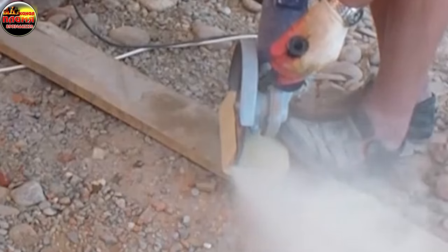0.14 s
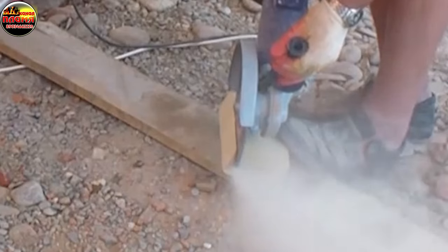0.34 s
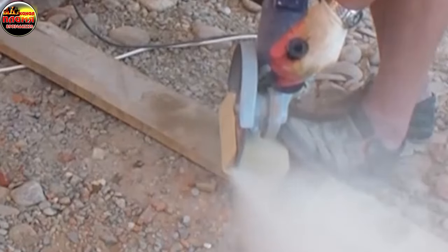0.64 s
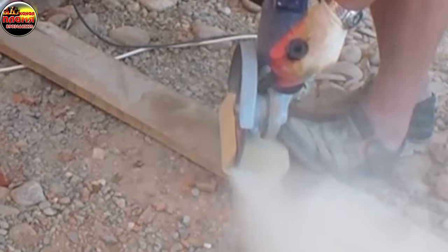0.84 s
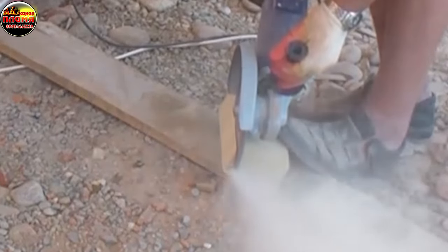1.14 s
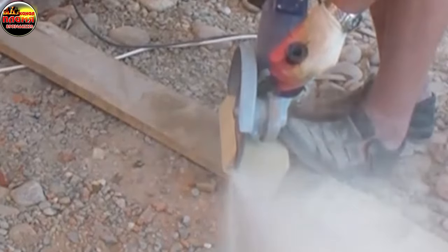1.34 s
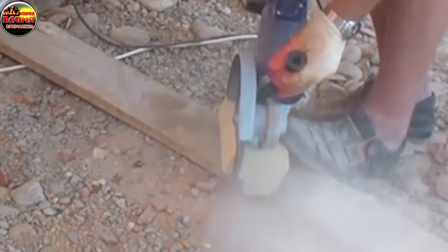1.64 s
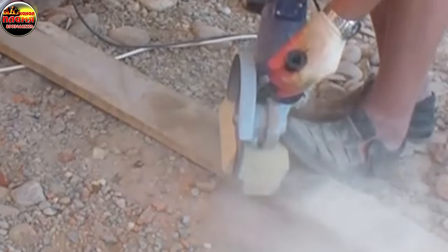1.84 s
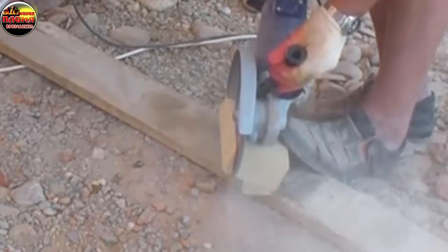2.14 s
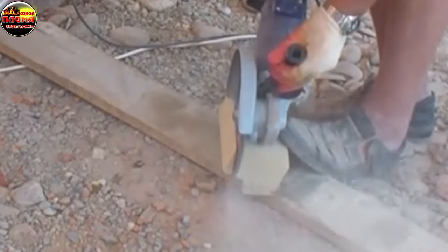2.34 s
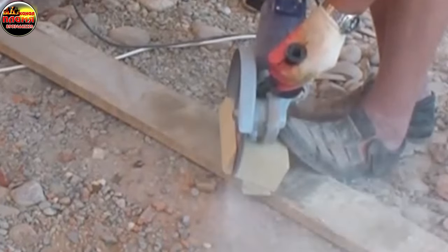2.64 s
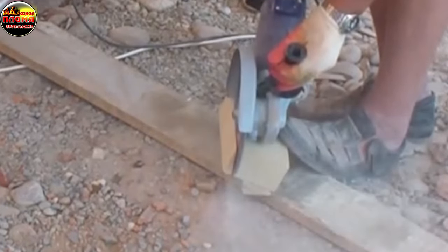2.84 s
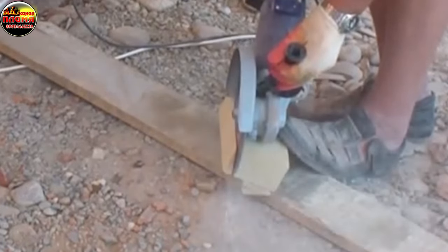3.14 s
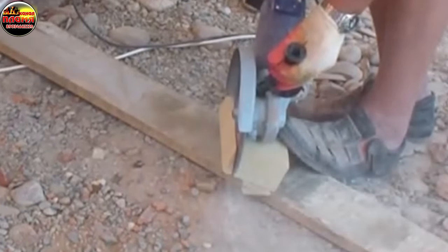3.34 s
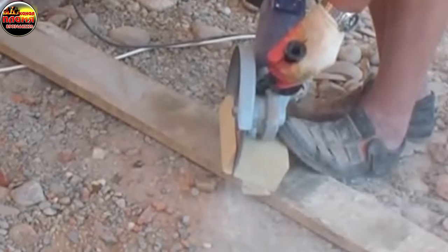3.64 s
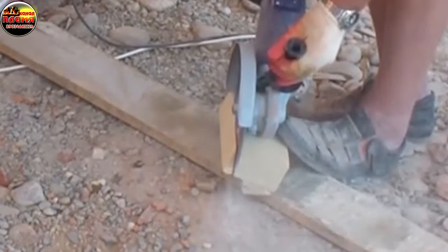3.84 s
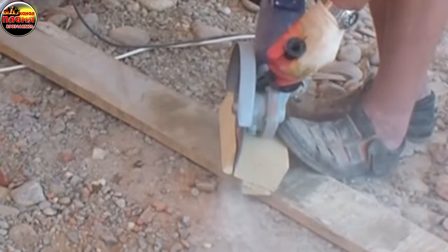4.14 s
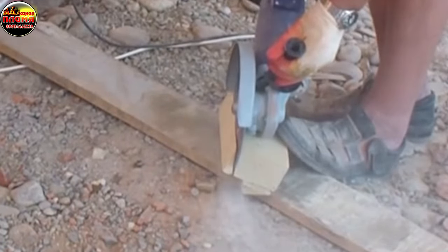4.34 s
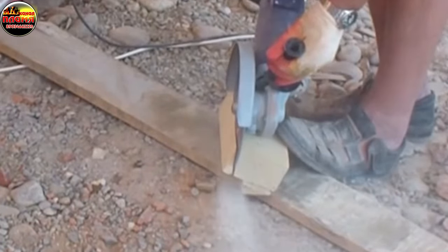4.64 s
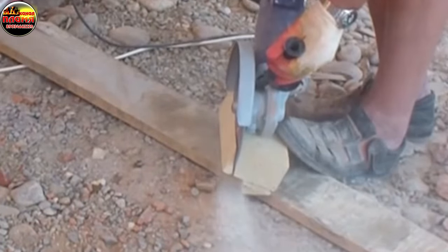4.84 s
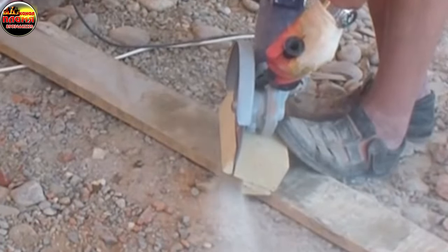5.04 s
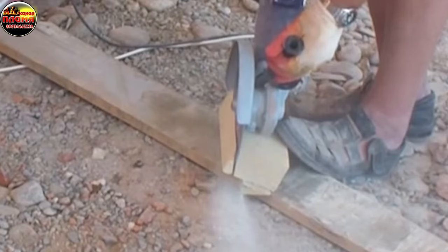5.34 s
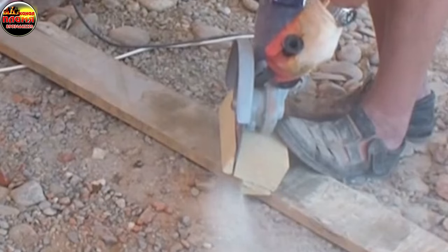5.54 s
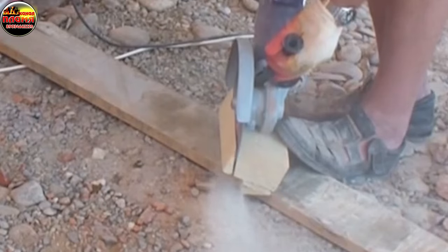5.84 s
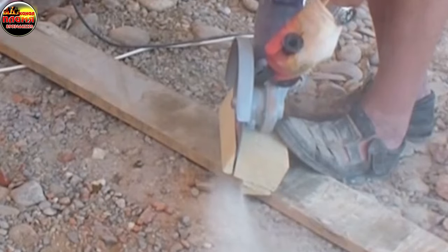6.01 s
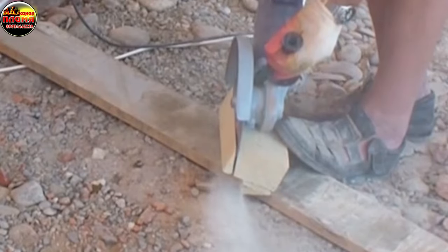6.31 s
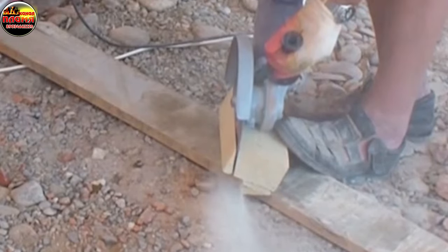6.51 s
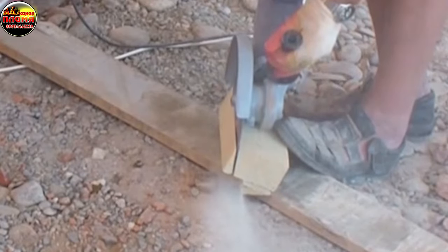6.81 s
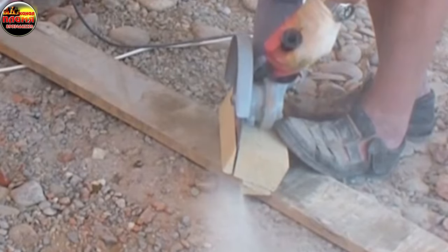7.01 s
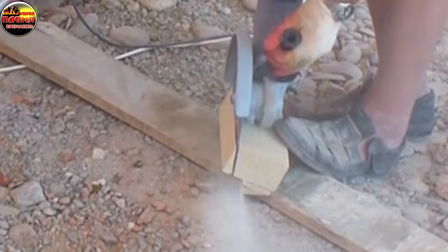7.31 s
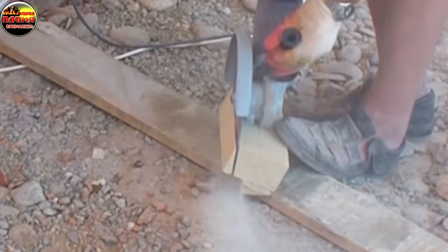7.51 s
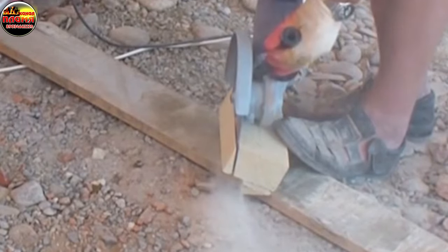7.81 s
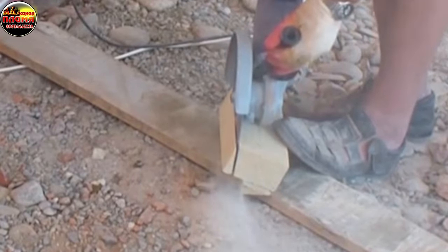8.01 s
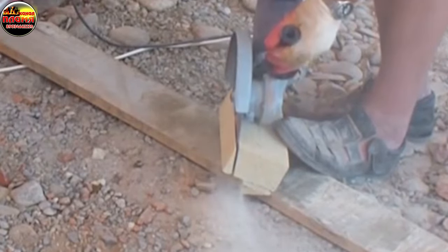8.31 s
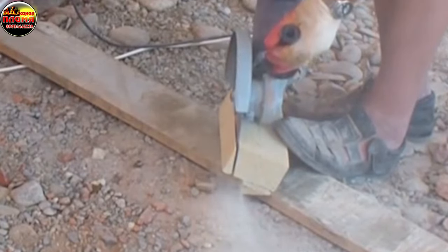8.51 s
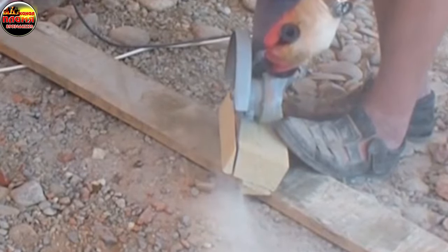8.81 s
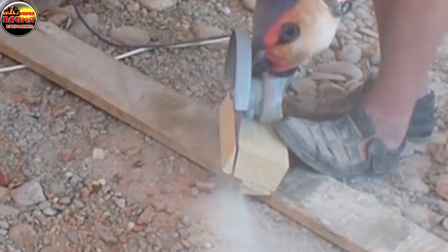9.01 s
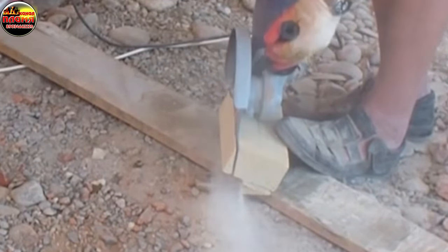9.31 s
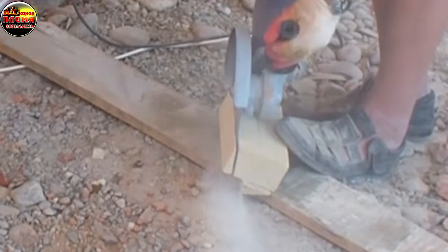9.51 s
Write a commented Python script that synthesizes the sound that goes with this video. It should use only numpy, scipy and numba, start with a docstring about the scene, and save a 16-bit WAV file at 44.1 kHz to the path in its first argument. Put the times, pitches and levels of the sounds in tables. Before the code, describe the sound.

A grinder's disc is already cutting brick at 0 seconds and never stops through about 9.7 seconds. Close and dry outdoors, the sound is a dense bright hiss of torn grit and dust, packed with rough, shrill metallic resonances, with a fast buzz-like flutter from the spinning disc and the hand's pressure. Beneath it a much quieter hoarse growl throbs irregularly, with clear surges around 0.2 to 1.5, 1.9, 2.3, 3.6 to 3.8 and 5.1 seconds. Near 1.7 the disc seats: the ringing rises slightly in pitch and the scrape becomes fuller. Small changes of colour follow near 2.8, 4.1 and 5.5, and gradually from 7.7 to 8.3. From about 5.4, short rough mid-pitched whines flicker in and out, strongest around 8.1 to 9.4, when the bite eases slightly around 9.2 before recovering. Treble is wide in stereo, lower sound central.

```python
"""Cutting a brick on gravel

Outdoors, an angle grinder's steel disc cuts a brick on gravel, close to a small camera. Dense random grit rings
the modes of disc, brick and guard; the depth of the slot sets how loud each mode is. Coloured noise makes the
hiss of torn grit and dust. The hand's pressure makes the bite flutter, and the disc rubs once a turn. The low
growl throbs as the disc catches, and wavering sine tones make short spells of whine."""
import sys
import numpy as np
from scipy import signal
from scipy.fft import rfft, irfft, next_fast_len
from scipy.io import wavfile
from scipy.ndimage import uniform_filter1d
from numba import njit

SR = 44100
rng = np.random.default_rng(int(sys.argv[2]) if len(sys.argv) > 2 else 0)


def store_pcm(level_fs):
    """Save levels as 16-bit WAV."""
    pcm = np.round(np.clip(level_fs, -1, 1) * 32767).astype(np.int16)
    wavfile.write(sys.argv[1], SR, np.atleast_2d(pcm).T)


N = 425994


def undb(db):
    """Amplitude factor of a level in dB."""
    return np.exp(np.asarray(db) * (np.log(10) / 20))


def unit(x):
    """Scale to an rms of 1, taken over all views together."""
    return x / np.sqrt(np.mean(x ** 2))


def seconds():
    """Time of every sample in s."""
    return np.arange(N) / SR


def curve(table):
    """Columns of a table after its time column, one value per sample."""
    time_s, *columns = np.transpose(table)
    return [np.interp(seconds(), time_s, column) for column in columns]


def colour(x, table):
    """Shape a signal to a (Hz, dB) spectrum, read on a log-frequency axis."""
    size = next_fast_len(N)
    bin_hz = np.arange(size // 2 + 1) * SR / size
    table_hz, table_db = np.transpose(table)
    gain_db = np.interp(np.log(np.maximum(bin_hz, 1)), np.log(table_hz), table_db)
    return irfft(rfft(x, size) * undb(gain_db), size)[:N]


def walk(rate_hz):
    """Random levels held 1 / rate_hz s and smoothed twice; spread 1."""
    hold = int(SR / rate_hz)
    levels = np.repeat(rng.standard_normal(int(N / 200)), hold)[:N]
    levels = uniform_filter1d(uniform_filter1d(levels, hold), hold)
    return levels / levels.std()


def split(x, hz):
    """The parts below and above hz."""
    low = signal.sosfiltfilt(signal.butter(2, hz, fs=SR, output="sos"), x)
    return low, x - low


@njit
def ring(x, start, tuning, stretch, damping):
    """A resonance applied twice (steep skirts), gain 1 at its centre; reads x from its own starting place."""
    y = np.empty(len(x))
    band1, low1, band2, low2 = 0., 0., 0., 0.
    for i in range(len(x)):
        j = (i + start) % len(x)
        g = tuning * stretch[i]
        d = 1 / (1 + g * (g + damping))
        first = (band1 + g * (x[j] - low1)) * d
        band1, low1 = 2 * first - band1, low1 + 2 * g * first
        second = (band2 + g * (damping * first - low2)) * d
        band2, low2 = 2 * second - band2, low2 + 2 * g * second
        y[i] = damping * second
    return y


def resonate(x, start, hz, width_hz, stretch):
    """Ring at hz; width_hz is that of each of the two passes."""
    return ring(x, start, np.tan(np.pi * hz / SR), stretch, width_hz / hz)


def grit(coarse_db):
    """Grains torn off one after another, most small, a few large."""
    size_db = coarse_db * np.minimum(rng.exponential(size=N), 6)
    return unit(rng.standard_normal(N) * undb(size_db))


TWO_VIEWS_HZ = 5200  # lower modes are given one view only, near the centre


def modes(table, depth, stretch, waver_db, drift, waver_hz):
    """Grit rings each mode, which swells and drifts in pitch alone; high modes get a second, unrelated view."""
    force, out = grit(1.28), np.zeros((2, N))
    waver = walk(waver_hz)
    for hz, width_hz, *stage_db in table:
        # the same waver, read from different places
        swell = np.roll(waver, rng.integers(N))
        bend = np.roll(waver, rng.integers(N))
        gain = undb(np.interp(depth, range(len(stage_db)), stage_db) + waver_db * swell)
        for view in range(2 if hz > TWO_VIEWS_HZ else 1):
            start = rng.integers(N)  # reads the grit from a random place, so the noises are unrelated
            out[view] += gain * resonate(force, start, float(hz), width_hz, stretch + drift * bend)
    return out


# how the deepening slot holds the disc: time_s, stage (0 shallow, 1 just seated, 5 deepest)
SLOT_STAGES = [(0, 0), (1.66, 0), (1.76, 1), (2.75, 1), (2.95, 2), (4.06, 2), (4.14, 3), (5.35, 3),
               (5.65, 4), (7.7, 4), (8.35, 5), (9.66, 5)]


def slot_depth():
    """Stage of the slot's grip, which sets the balance of the modes."""
    depth, = curve(SLOT_STAGES)
    return depth


# slow course of the cut: time_s, bite_db (level of the rim),
# scrape_db (gain of the brick, guard and dust between 2 and 7.3 kHz), boom_db (level below 2 kHz)
CUT_COURSE = [(0, -32, -2.5, -52), (1.3, -33, -2, -53), (1.5, -32.5, -0.6, -53), (1.62, -32.5, -1.7, -53.5),
              (1.74, -34.2, 2, -49), (1.85, -33.5, 3, -50), (2.6, -32.5, 0.5, -51), (3.45, -33, 0.5, -52),
              (3.7, -32.5, -0.3, -49), (4.02, -34, 1, -52.5), (4.14, -32, -1.7, -50.4),
              (4.5, -33.5, 1.1, -52.5), (5.8, -33, -2.2, -50), (6.4, -32.5, -1, -53),
              (7.3, -33, -0.5, -51.5), (7.9, -33, -1, -50), (8.6, -33.5, 0.5, -50.5),
              (8.95, -34.5, 1.2, -50), (9.22, -36, 1.5, -48), (9.44, -33, 1.7, -51), (9.66, -33, -2.5, -49)]


def cut_course():
    """Levels of bite, scrape and boom in dB as the cut goes on."""
    return curve(CUT_COURSE)


# modes of the steel disc: pitch_hz (once seated), width_hz (each pass), level_db (relative) at stages 0 to 5
DISC_MODES = [(4097, 87, -17.0, -15.5, -16.5, -21.5, -21.5, -16.0),
              (4229, 75, -13.0, -10.0, -12.5, -11.0, -12.5, -14.0),
              (4348, 73, -27.5, -11.5, -18.5, -27.5, -27.5, -27.5),
              (4447, 129, -16.0, -12.0, -11.0, -11.5, -10.5, -13.0),
              (4629, 87, -20.0, -23.0, -23.0, -24.0, -20.0, -16.5),
              (4990, 132, -16.0, -12.0, -12.0, -13.5, -13.5, -13.5),
              (5249, 82, -28.5, -15.5, -13.5, -16.0, -12.5, -16.5),
              (5360, 84, -12.0, -17.0, -16.5, -12.0, -14.0, -20.0),
              (5500, 105, -14.0, -16.5, -13.0, -12.5, -14.5, -15.5),
              (5620, 65, -27.5, -18.0, -18.5, -27.5, -18.5, -11.5),
              (5772, 84, -15.0, -18.0, -14.0, -12.5, -15.5, -12.5),
              (5880, 70, -13.5, -19.0, -13.5, -23.5, -16.0, -16.0),
              (5972, 70, -25.0, -18.0, -20.5, -12.5, -23.5, -18.5),
              (6075, 56, -25.0, -9.0, -11.0, -20.0, -14.5, -18.5),
              (6154, 82, -15.5, -15.5, -14.5, -11.5, -21.5, -27.5),
              (6210, 36, -6.5, -15.5, -14.0, -20.0, -16.0, -22.5),
              (6280, 82, -25.0, -15.5, -19.5, -18.0, -14.5, -16.0),
              (6391, 99, -11.0, -8.5, -9.0, -8.5, -13.5, -16.5),
              (6549, 132, -18.5, -11.0, -14.5, -19.5, -21.0, -27.0),
              (6760, 65, -24.0, -14.0, -8.0, -9.5, -16.0, -16.5),
              (6845, 60, -4.0, -10.0, -11.0, -8.5, -11.5, -17.0),
              (6920, 60, -8.5, -6.5, -10.0, -22.0, -19.5, -22.5),
              (7075, 240, -11.0, -10.0, -11.0, -10.0, -13.0, -12.5),
              (7343, 240, -10.5, -14.5, -11.5, -13.5, -17.5, -22.5),
              (7753, 76, -1.5, -2.0, -5.0, -3.5, -2.5, -3.5),
              (7930, 172, -7.5, -4.5, -5.5, -3.5, -4.0, -5.0),
              (8124, 112, -5.5, -21.5, -21.5, -7.0, -10.0, -21.5),
              (8299, 240, -3.0, -7.5, -7.0, -8.0, -10.0, -5.0),
              (8473, 157, -17.0, -1.0, -2.0, -4.0, -2.0, -4.0),
              (8738, 234, -6.0, -22.0, -9.0, -8.5, -10.0, -9.5),
              (9119, 240, -8.0, -1.0, -7.0, -4.5, -4.5, -5.0),
              (9340, 240, -10.0, -5.5, -2.0, -10.0, -6.0, -5.5),
              (9565, 222, -4.0, -3.5, -2.5, -3.0, -3.5, -4.5),
              (9848, 112, -13.0, 3.0, -2.5, -3.5, -3.5, -6.0), (9975, 96, -3.0, -6.0, -3.0, 0.5, 0.0, -3.0),
              (10400, 165, -3.0, -1.0, -0.5, -1.0, -1.5, -4.0),
              (10602, 76, -3.5, -2.0, -0.5, -6.0, -7.5, -8.0),
              (11010, 115, -4.5, 1.0, -1.5, -2.0, -1.0, -1.0),
              (11199, 187, -9.5, -7.0, -23.0, -23.0, -19.0, -14.5),
              (11556, 102, 1.5, 1.5, 2.0, -2.5, -1.5, -5.0),
              (11880, 140, -27.0, -11.0, -20.5, -13.5, -17.0, -27.0),
              (12094, 86, -8.0, -1.5, -2.0, -6.5, -6.5, -8.5),
              (12606, 240, -14.5, -22.0, -16.5, -12.5, -19.5, -18.0),
              (12822, 103, -15.0, -7.0, -10.5, -14.0, -10.0, -11.5),
              (13020, 120, -17.0, -31.5, -19.0, -16.0, -15.5, -19.5),
              (13469, 39, -19.0, -16.5, -8.5, -11.0, -15.5, -24.5),
              (13802, 150, -16.5, -10.0, -14.5, -14.5, -17.5, -19.0),
              (14300, 180, -16.0, -12.0, -14.0, -15.0, -20.5, -28.0),
              (15404, 110, -18.5, -14.5, -16.5, -21.0, -18.5, -21.0)]
SEATED_STRETCH = 0.007  # share by which a shallow slot leaves the modes lower


def disc(depth):
    """The rim's grit rings the disc; the seated disc is stiffer, so its modes rise."""
    stretch = 1 - SEATED_STRETCH * np.clip(1 - depth, 0, 1)
    return modes(DISC_MODES, depth, stretch, waver_db=1.8, drift=0.003, waver_hz=16)


# modes of the brick and the guard: pitch_hz, width_hz (each pass), level_db (relative) at stages 0 to 5
BRICK_MODES = [(200, 17, -43.0, -59.0, -51.5, -52.0, -44.5, -59.0),
               (384, 15, -32.0, -36.0, -32.5, -31.5, -31.0, -36.5),
               (442, 23, -29.5, -32.0, -32.0, -30.5, -32.0, -34.0),
               (526, 25, -48.0, -48.0, -48.0, -48.0, -32.0, -39.0),
               (618, 38, -25.5, -22.5, -24.5, -32.0, -27.0, -24.5),
               (668, 17, -22.5, -23.5, -18.0, -18.5, -21.5, -27.5),
               (726, 16, -22.5, -34.5, -26.0, -27.5, -23.5, -38.5),
               (852, 28, -16.5, -14.5, -17.0, -17.5, -17.0, -21.5),
               (912, 22, -29.5, -18.0, -18.0, -20.0, -20.5, -18.0),
               (986, 21, -4.5, -6.0, -6.5, -7.0, -7.0, -9.5),
               (1028, 29, -4.0, -3.5, -5.5, -10.5, -18.0, -18.0),
               (1069, 25, -10.0, -14.5, -10.0, -7.5, -8.5, -10.0),
               (1130, 58, -16.5, -11.5, -13.0, -10.5, -12.0, -12.0),
               (1246, 64, -10.5, -16.0, -18.0, -16.0, -18.5, -15.5),
               (1322, 58, -15.5, -29.5, -18.0, -14.0, -17.0, -13.5),
               (1362, 50, -10.0, -13.5, -19.5, -16.0, -8.0, -14.5),
               (1414, 28, -12.0, -11.0, -12.0, -9.5, -10.5, -7.5),
               (1538, 73, -28.5, -28.5, -28.5, -28.5, -20.0, -12.5),
               (1616, 61, -22.5, -27.0, -17.5, -16.5, -32.5, -18.0),
               (1846, 27, -18.5, -8.0, -14.5, -12.5, -11.5, -11.0),
               (1900, 58, -19.0, -20.0, -29.5, -15.5, -31.5, -16.5),
               (2020, 46, -16.0, -21.5, -31.0, -15.0, -22.5, -17.5),
               (2173, 87, -32.0, -23.5, -32.0, -32.0, -32.0, -16.0),
               (2419, 42, -20.0, -12.0, -12.5, -18.5, -18.5, -16.0),
               (2563, 45, -14.0, -30.0, -30.0, -30.0, -23.5, -17.5),
               (2757, 27, -18.5, -16.5, -16.0, -10.0, -11.0, -26.0),
               (2792, 168, -10.0, -13.5, -16.5, -13.0, -12.5, -13.0),
               (3036, 60, -31.0, -18.5, -21.0, -31.0, -31.0, -15.0),
               (3187, 103, -12.5, -12.0, -19.0, -15.0, -11.5, -14.5),
               (3290, 70, -30.5, -16.0, -14.5, -16.0, -23.5, -17.0),
               (3526, 102, -22.0, -17.0, -19.5, -18.0, -19.5, -20.0),
               (3740, 112, -15.0, -12.5, -13.5, -17.0, -12.5, -13.5),
               (3797, 24, -24.0, -8.0, -10.0, -18.5, -24.0, -19.5),
               (3928, 46, -19.5, -12.5, -16.0, -19.5, -28.5, -28.5)]


def brick_and_guard(depth):
    """Grit rings the brick and the guard, whose modes keep their pitch apart from small drifts."""
    return modes(BRICK_MODES, depth, np.ones(N), waver_db=1.2, drift=.0025, waver_hz=18)


# broad hiss of torn grit and flying dust: pitch_hz, level_db (relative, per Hz)
DUST_SPECTRUM = [(60, -63), (90, -70), (200, -47.5), (430, -34), (740, -28.5), (950, -18), (1300, -16),
                 (1500, -20.5), (1700, -21), (2250, -20.5), (2950, -18), (3450, -20.5), (4050, -20),
                 (4800, -20.5), (5150, -21), (5700, -20.5), (6600, -19), (7550, -18), (7750, -10),
                 (10000, -7), (12150, -11), (12350, -17.5), (14400, -21.5), (14900, -21), (15400, -24)]


def dust():
    """Torn grit and flying dust hiss broadly: uneven noise, coloured, as two unrelated views."""
    return np.array([colour(grit(1.43), DUST_SPECTRUM) for _ in range(2)])


TURNS_HZ, TURNS_WANDER = 119.7, 0.0492  # disc speed under load, and its spread as a share


def rub_once_a_turn():
    """The disc runs slightly out of true, so it rubs harder once a turn."""
    speed_hz = TURNS_HZ * (1 + TURNS_WANDER * walk(2.5))
    turns = np.cumsum(speed_hz) / SR
    return 1 + 0.091 * np.cos(2 * np.pi * turns)


def hand_pressure():
    """The hand's pressure makes the bite flutter: a gain that wavers at two rates."""
    return undb(0.53 * walk(20) + 0.6 * walk(36))


STEADY_S = .5  # averaging stretch


def steady(x):
    """Level out the slow swells: divide both views by the first one's running rms."""
    return x / np.sqrt(uniform_filter1d(x[0] ** 2, int(STEADY_S * SR)))


# left and right differ by pitch, little below 5 kHz, much in the treble: pitch_hz, level_db (gain of the side
# signal)
STEREO_WIDTH = [(60, -16), (200, -32), (1000, -28.5), (2000, -60), (4900, -36.5), (5400, -7.5),
                (8100, -5.5), (11000, -5.5), (15000, -0.5)]
LEFT_LEAD_S = 8e-6  # lead of the left side, before STEREO_WIDTH confines it mostly to the treble


def spread(mid, other):
    """Left and right differ by the unrelated view and by a slight lead of the left, mostly in the treble."""
    lead = LEFT_LEAD_S * SR * np.gradient(mid)  # slope times time is a small shift
    side = colour(other + lead, STEREO_WIDTH)
    return np.array([mid + side, mid - side])


# catches of the disc in the brick: centre_s, rise_db
CATCHES = [(0.2, 4.5), (0.7, 5.5), (0.89, 7), (1.07, 4), (1.24, 5), (1.47, 2), (1.72, 1.5), (1.87, 5.5),
           (2.01, 1.5), (2.13, 1), (2.3, 5), (2.5, 1), (3.6, 5), (3.84, 4.5), (4.22, 0.5), (4.92, 2.5),
           (5.1, 4.5), (5.36, 2.5), (6.74, 1.5), (7.0, 3), (7.6, -1), (7.76, 3.5), (8.12, 1)]
THROB_S, SLACK_S, SLACK = 0.031, 0.056, 0.31  # half width; a dip follows this late, as a share of the rise


def throb():
    """Gain of the growl: each catch swells, then slackens; smaller ones come at random."""
    t = seconds()

    def bump(centre_s):
        return np.exp(-((t - centre_s) / THROB_S) ** 2)

    catches_db = sum(db * (bump(s) - SLACK * bump(s + SLACK_S)) for s, db in CATCHES)
    return undb(catches_db + 0.67 * walk(14))


GROWL_HZ, GROWL_WIDTH_HZ = 1100, 910  # the part of the boom that throbs; width of each pass


def throbbing_boom(boom):
    """The growl inside the boom throbs as the disc catches in the brick."""
    growl = np.array([resonate(view, 0, GROWL_HZ, GROWL_WIDTH_HZ, np.ones(N)) for view in boom])
    return boom + (throb() - 1) * growl


# low modes, mostly one, rubbed into spells of whine: start_s, length_s, level_db (rms before flicker), pitch_hz
WHINE_SPELLS = [(5.416, 0.078, -53.5, 994), (5.583, 0.28, -57, 994), (5.956, 0.14, -58, 997),
                (7.122, 0.03, -57, 990), (5.6, 0.146, -53, 990), (11, 0.24, -53, 990),
                (7.2, 0.098, -54, 984), (8.102, 0.073, -52.5, 983.6), (6.7, 0.11, -57, 1100),
                (8.44, 0.052, -49.5, 988.9), (8.567, 0.205, -53, 978), (8.1, 0.267, -47, 985),
                (9.248, 0.16, -49.5, 985), (8.53, 0.081, -53, 1426), (8.877, 0.089, -52, 1500),
                (9.9, 0.075, -46, 1062), (9.17, 0.064, -53, 1130), (9.8, 0.3, -56, 1500),
                (6.48, 0.091, -55.5, 987)]
WHINE_EDGE_S = 0.024  # fade in and out


def whine():
    """Spells of a rough tone that flickers in level and pitch as the rim slips."""
    t, out = seconds(), 0
    flicker = undb(1.4 * walk(35))
    slip = np.cumsum(4 * walk(30)) / SR  # cycles gained by a pitch spread of 4 Hz
    for start_s, length_s, level_db, pitch_hz in WHINE_SPELLS:
        inside_s = np.minimum(t - start_s, start_s + length_s - t)
        fade = np.clip(inside_s / WHINE_EDGE_S + .5, 0, 1)
        out = out + fade * undb(level_db) * np.sin(2 * np.pi * (pitch_hz * t + slip))
    return np.sqrt(2) * flicker * out


def scene():
    """The rim's bite, the throbbing boom and the whine, heard close by in stereo."""
    depth = slot_depth()
    bite_db, scrape_db, boom_db = cut_course()
    disc_ring = disc(depth)
    boom, rest = split(brick_and_guard(depth) + dust(), 2000)
    boom = throbbing_boom(boom)
    scrape, spray = split(rest, 7300)
    rub, flutter = rub_once_a_turn(), hand_pressure()
    bite = disc_ring + spray + undb(scrape_db) * scrape
    rim = rub * flutter * undb(0.11 * walk(14)) * bite
    mid, other = undb(bite_db) * steady(rim) + undb(boom_db) * unit(flutter * boom)
    return spread(mid + whine(), other)


TOP_HZ = 15740


def record(dry):
    """The camera cuts the top steeply, above TOP_HZ."""
    return signal.sosfilt(signal.ellip(14, .3, 70, TOP_HZ, fs=SR, output="sos"), dry)


dry = scene()
out = record(dry)
store_pcm(out)
```